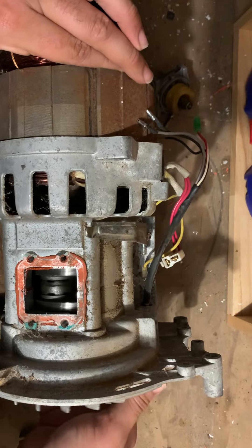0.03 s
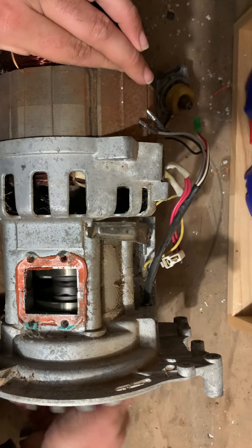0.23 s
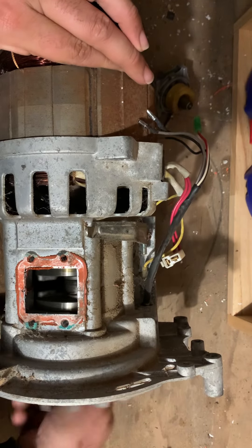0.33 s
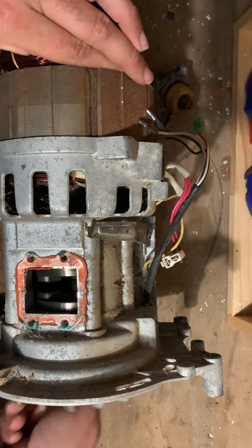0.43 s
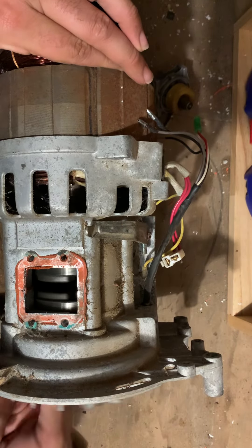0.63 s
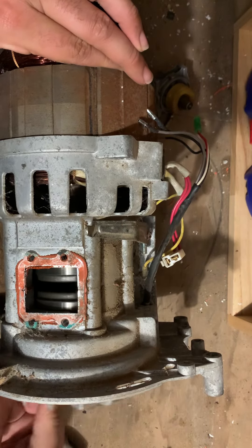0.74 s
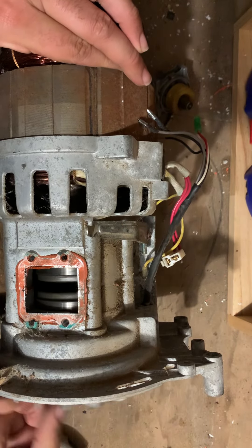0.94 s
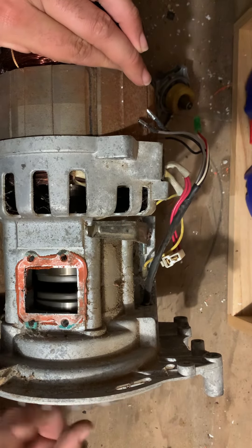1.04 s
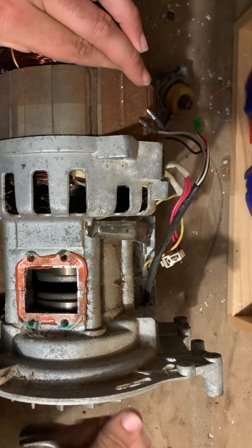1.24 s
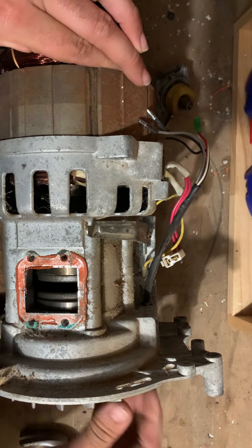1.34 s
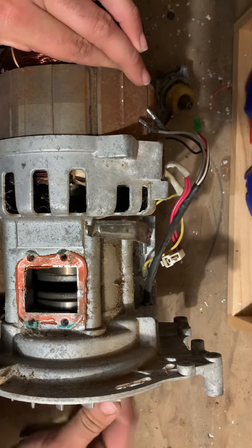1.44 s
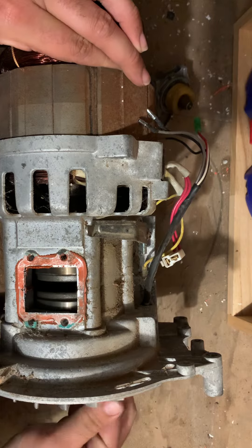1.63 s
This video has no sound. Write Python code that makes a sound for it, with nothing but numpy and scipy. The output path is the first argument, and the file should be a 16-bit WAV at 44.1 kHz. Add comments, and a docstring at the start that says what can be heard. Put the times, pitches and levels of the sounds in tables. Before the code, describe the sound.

Dry metal scraping and clunking as a small engine's piston is rocked by hand.

```python
"""A dry piston scrapes down its bore and back as the crankshaft of a small stripped engine is rocked by hand.
Its stick and slip rings the cast housing; loose parts take up their play with clunks. On top ride small
ticks, a thin steel squeal and a fine hiss, probably fingers sliding over the metal. The wooden bench rumbles
and thuds softly when the hand takes a new grip. It is all heard close, at a phone in a small workshop."""
import sys
import numpy as np
from scipy import signal
from scipy.fft import rfft, irfft
from scipy.io import wavfile
from scipy.ndimage import uniform_filter1d

SR = 44100
rng = np.random.default_rng(int(sys.argv[2]) if len(sys.argv) > 2 else 0)


def unload_wav(signal):
    """Save mono or channel-first audio to the path in sys.argv[1] as 16-bit WAV at rate SR, clipped to [-1, 1]."""
    wavfile.write(
        sys.argv[1],
        SR,
        np.round(np.clip(np.atleast_2d(signal).T, -1, 1) * 32767).astype(np.int16),
    )


N = 74970

# Modes of the cast housing. Each row: pitch in Hz, t60 in seconds, then relative level in dB
# when knocked, in the down stroke and in the back stroke.
HOUSING_MODES = [(445, 0.13, -21, -12.5, -6), (467, 0.11, -12.5, -24.5, -6), (537.2, 0.23, -4.5, -7, -14),
                 (604, 0.059, -4, -2.5, -9.5), (824.2, 0.18, 3, -2.5, -6), (844.4, 0.1, 6, -0.5, -4.5),
                 (900.2, 0.18, 1, -10.5, -6), (996, 0.14, -7.5, -26.5, 0.5), (1252.7, 0.15, 2, 7, 1),
                 (1327, 0.028, 4.5, -29.5, 0.5), (1477, 0.075, -1, -3, -30), (1638, 0.11, -10.5, -26.5, -6),
                 (1782, 0.059, -1, 0.5, -5.5), (1908, 0.036, -11, -5.5, -1), (2519, 0.16, -2.5, -7, -28.5)]
# Bright steel modes. Each row: pitch in Hz, t60 in seconds, relative dB when knocked and when rubbed.
STEEL_MODES = [(3683, 0.25, -2, -62.5), (4100, 0.051, 8.5, -31.5), (5950, 0.09, -3, -12),
               (6540, 0.06, -8, -8), (7230, 0.33, -7.5, -42), (10570, 0.12, -16.5, -7),
               (10955, 0.037, -31, -2.5), (10770, 0.063, -26, -8.5), (13800, 0.088, -18, -6.5)]
# Knocks of the loose parts, then three soft, dull thuds as the hand takes a new grip on the flywheel.
# Each row: start in seconds, levels in dB sent to the housing, the clack and the bench thud,
# pitch of the contact in Hz, its t60 in seconds.
BLOWS = [(.1008, -39, -72, -81, 1276, 0.071), (.138, -40.5, -63.5, -53, 1282, 0.12),
         (0.218, -32.5, -52.5, -80, 1250, 0.076), (.2440, -34.5, -51.5, -64, 1260, 0.11),
         (.2666, -20, -31.5, -43.5, 897, 0.05), (.2745, -29.5, -30.5, -54, 880, 0.031),
         (.2886, -28.5, -34, -45, 847, 0.15), (.3018, -26, -33.5, -59, 1200, 0.024),
         (.3612, -23.5, -38, -64, 1197, 0.025), (.4035, -31, -58, -47.5, 1150, 0.02),
         (.4630, -31, -51, -64, 900, 0.02), (.5215, -29, -95, -58, 1310, 0.017),
         (.5540, -35, -76, -84, 1300, 0.014), (.6010, -36.5, -72, -70, 1290, 0.017),
         (.6783, -33, -34.5, -58, 1243, 0.076), (.7960, -32, -44.5, -73, 983, 0.033),
         (.8015, -32.5, -64, -53, 940, 0.023), (.8293, -29, -46, -65, 1270, 0.037),
         (.9290, -38, -54, -79, 1100, 0.022), (.9690, -35, -58, -74, 1215, 0.053),
         (.9840, -34.5, -57, -89, 930, 0.13), (1.0130, -31, -50, -76.5, 992, 0.093),
         (1.0295, -35, -54, -82, 1001, 0.13), (1.0515, -34, -53, -55.5, 910, 0.031),
         (1.1100, -38.5, -59, -72, 1000, 0.049), (1.1456, -41, -36, -78, 952, 0.15),
         (1.4375, -42.5, -55, -47.5, 569, 0.067), (1.4570, -42, -54, -55.5, 890, 0.061),
         (1.4745, -57.5, -62, -40.5, 444, 0.15)]
# Colours of the housing's crowded modes and of the fine high hiss. Each row: frequency in Hz, relative dB.
BODY_COLOUR = [(380, -34), (520, -23), (700, -38), (880, -3), (1300, 1), (1800, -12), (2150, -17.5),
               (2550, -17.5), (3200, -23), (5000, -58)]
HISS_COLOUR = [(3000, -55.5), (7200, -27), (9500, -26.5), (11300, 5.5), (13000, 4.5), (16000, -5)]
BODY_T60_S, ATTACK_S = 0.037, 0.0004


def undb(db):
    """Decibels to gain."""
    return 10 ** (np.asarray(db) / 20)


def unit(x):
    """Scale to rms 1."""
    return x / np.sqrt(np.mean(x ** 2))


def clock():
    """Time of every sample in seconds."""
    return np.arange(N) / SR


def bell(x, centre, width):
    """A bell curve of height 1; the width is its standard deviation."""
    return np.exp(-.5 * ((x - centre) / width) ** 2)


def fader(rows, column=1):
    """Gain over time along a level curve, silent outside it."""
    rows = np.array(rows)
    return undb(np.interp(clock(), rows[:, 0], rows[:, column], left=-np.inf, right=-np.inf))


def eq_curve(points):
    """Gain at every frequency, drawn through (Hz, dB) points."""
    hz, db = np.array(points).T
    return undb(np.interp(np.log(np.fft.rfftfreq(N, 1 / SR) + 1), np.log(hz + 1), db))


def noise(colour):
    """Noise of a given colour, rms 1."""
    return unit(irfft(rfft(rng.standard_normal(N)) * eq_curve(colour), N))


def band_noise(hz, width_hz):
    """Noise in one bell-shaped band, rms 1; around 0 Hz it is a random wander."""
    band = bell(np.fft.rfftfreq(N, 1 / SR), hz, width_hz)
    return unit(irfft(rfft(rng.standard_normal(N)) * band, N))


def fade(t60):
    """A fast attack and an exponential decay."""
    return (1 - np.exp(-clock() / ATTACK_S)) * np.exp(-np.log(1000) * clock() / t60)


def shaped(x, envelope):
    """Put an envelope on a sound and give the result the envelope's energy."""
    x = x * envelope
    return x * np.sqrt(np.sum(envelope ** 2) / np.sum(x ** 2))


def ping(hz, t60):
    """One struck mode: a dying sine."""
    return np.sin(2 * np.pi * hz * clock()) * fade(t60)


def ring(modes, column):
    """A set of modes answers one tap; neighbouring rows swing in opposite senses."""
    gains = undb(np.array(modes)[:, column])
    waves = sum((-1) ** k * gains[k] * ping(hz, t60) for k, (hz, t60, *_) in enumerate(modes))
    return waves / np.sqrt(np.sum(gains ** 2) / 2)


def burst(colour, t60):
    """A crowd of short modes: coloured noise that dies away."""
    return shaped(noise(colour), fade(t60))


def drive(force, response):
    """Send a force through a response scaled to unit energy."""
    return signal.fftconvolve(force, response / np.sqrt(np.sum(response ** 2)))[:N]


def delay(x, start_s):
    """Start a sound at a given time."""
    return np.concatenate([np.zeros(int(start_s * SR)), x])[:N]


def room_tone():
    """The workshop's faint, low, steady air."""
    # Each row: frequency in Hz, relative level in dB.
    colour = [(25, -21.5), (60, 2.5), (290, -1.5), (600, -4), (1200, -18), (16000, -21.5)]
    return undb(-72) * noise(colour)


def reflections(x, colour, t60):
    """A coloured wash of reflections that dies away, different left and right."""
    coloured = irfft(rfft(x) * eq_curve(colour), N)
    responses = [delay(rng.standard_normal(N) * fade(t60), start_s=0.0045) for _ in range(2)]
    return np.array([drive(coloured, response) for response in responses])


def ambience(x):
    """The bench throws back a short, warm echo; the workshop adds a faint, bright tail."""
    # Each row of both: frequency in Hz, relative level in dB.
    echo_colour = [(100, -3), (400, 17), (2800, -0.5), (16000, -36)]
    tail_colour = [(1000, -10), (3800, 16.5), (16000, -10)]
    echo = undb(-15) * reflections(x, echo_colour, t60=0.1)
    return echo + undb(-29) * reflections(x, tail_colour, t60=0.55)


def stereo_ports(x):
    """Sound reaches the phone's two microphone ports at slightly different times and levels."""
    # Each row: frequency in Hz, lead of the left side in radians.
    phase_lead = [(0, 0), (560, -.2), (750, .7), (1650, .6), (2500, 2.2), (3300, 1.6), (4200, 2.3),
                  (4700, 3.2), (14800, 18.7), (16000, 18.9)]
    # Each row: frequency in Hz, left minus right in dB.
    balance = [(60, 4), (110, -4.5), (380, -5.5), (1290, -5.5), (2380, -1), (15000, 0.1)]
    lead = np.interp(np.fft.rfftfreq(N, 1 / SR), *np.array(phase_lead).T)
    port = np.sqrt(eq_curve(balance)) * np.exp(.5j * lead)
    spectrum = rfft(x)
    return np.array([irfft(spectrum * port, N), irfft(spectrum / port, N)])


def bench_rumble():
    """The bench rumbles under the rocking engine, with one soft, deep bump."""
    # Each row: frequency in Hz, relative level in dB.
    colour = [(30, -26), (70, -8.5), (110, -24.5), (150, 4), (215, 1), (270, -22.5), (900, -32)]
    # Each row: time in seconds, rumble level in dB.
    levels = [(0, -72.5), (.2, -63.5), (.33, -58.5), (.68, -62.5), (.92, -73), (1.35, -74.5), (1.48, -58.5),
              (1.58, -86), (1.7, -75)]
    bump = undb(-63) * band_noise(43.8, width_hz=30) * bell(clock(), centre=1.165, width=0.063)
    return noise(colour) * fader(levels) + bump


def bench_thud():
    """A soft push sets all modes of the bench top swinging together."""
    # Each row: pitch in Hz, t60 in seconds, relative level in dB.
    wood_modes = [(155, 0.16, -11), (177, 0.1, -6.5), (211, 0.11, -5)]
    soft_rise = 1 - np.exp(-clock() / 0.0036)
    return soft_rise * sum(undb(db) * ping(hz, t60) for hz, t60, db in wood_modes)


def ticks():
    """Brief ticks, chirps and swishes where a metal edge catches."""
    # Each row: centre time in seconds, level in dB, pitch in Hz, bell widths in Hz and in seconds.
    catches = [(0.335, -47, 12600, 2520, 0.0024), (0.341, -37.5, 11300, 410, 0.0016),
               (0.366, -35, 2550, 59.4, 0.0058), (0.4, -43.5, 3590, 220, 0.0062),
               (1.015, -50, 4020, 159, 0.012), (1.072, -47, 13300, 1110, 0.0091),
               (1.2486, -43, 5300, 2080, 0.00036), (1.576, -67.5, 14700, 1220, 0.0029),
               (1.381, -54, 14300, 904, 0.012)]
    return sum(undb(db) * shaped(band_noise(hz, width_hz), bell(clock(), at, width_s))
               for at, db, hz, width_hz, width_s in catches)


def sliding_hiss():
    """A fine, uneven high hiss of rubbing, probably fingers sliding over the metal; the steel sings faintly."""
    # Each row: time in seconds, level of the sliding force in dB.
    levels = [(0, -85), (.19, -71), (.28, -60), (.335, -48.5), (.37, -54.5), (.42, -50), (.48, -60),
              (.61, -58.5), (.69, -86), (.9, -80), (.96, -51), (1.055, -67), (1.076, -55), (1.12, -71),
              (1.3, -82), (1.42, -55), (1.445, -38), (1.475, -49), (1.51, -101), (1.66, -80), (1.7, -57)]
    flicker = undb(4 * band_noise(0, width_hz=28))
    force = unit(rng.standard_normal(N) * flicker) * fader(levels)
    hiss = undb(-3.5) * drive(force, burst(HISS_COLOUR, t60=0.051))
    return hiss + undb(-8) * drive(force, ring(STEEL_MODES, column=3))


def squeal():
    """Dry friction keeps one steel mode singing in surges, rough in pitch and strength."""
    # Each row: time in seconds, squeal level in dB.
    levels = [(.39, -55), (.408, -54), (.53, -61.5), (.56, -81), (.6, -57.5), (.66, -72), (.8, -76),
              (.84, -63.5), (.91, -70.5), (.99, -62), (1.07, -58), (1.13, -89)]
    hz = 5965 + 30 * band_noise(0, width_hz=90)
    flutter_db = 2.2 * band_noise(0, width_hz=90)
    surge_db = 3.5 * band_noise(0, width_hz=14)
    tone = np.sin(2 * np.pi * np.cumsum(hz) / SR)
    return unit(tone * undb(flutter_db + surge_db)) * fader(levels)


def clunks():
    """Each blow knocks at the contact, rings the housing, clacks the steel and thumps the bench."""
    # Each row: frequency in Hz, relative level in dB.
    clack_colour = [(900, -34), (1800, -8), (3300, 0.5), (4300, -3), (6200, -4.5), (8000, -12),
                    (11000, -27), (16000, -30)]
    housing, steel = ring(HOUSING_MODES, column=2), ring(STEEL_MODES, column=2)
    thud = bench_thud()
    hard_blow_db, out = -24, 0
    for start, body_db, clack_db, thud_db, hz, t60 in BLOWS:
        body = undb(-4.5) * (ping(hz, t60) + housing) + undb(-6) * burst(BODY_COLOUR, BODY_T60_S)
        steel_db = -9 + 0.6 * (body_db - hard_blow_db)  # harder blows leave more ring in the steel
        clack = undb(steel_db) * steel + undb(-1.5) * burst(clack_colour, t60=0.048)
        snap = undb(-5) * burst(HISS_COLOUR, t60=0.005)
        clunk = undb(body_db) * body + undb(clack_db) * (clack + snap) + undb(thud_db) * thud
        out = out + delay(clunk, start)
    return out


def sticking():
    """The parts stick just before each blow, ducking the scrape for a moment."""
    duck_db, stick_s = -9, 0.009
    hold = sum(bell(clock(), start - stick_s, stick_s) for start, *_ in BLOWS)
    return undb(duck_db * np.minimum(hold, 1))


def friction():
    """Stick and slip: uneven little jolts over a smooth rub, with a steady mean strength."""
    slips_per_s, spread_db = 380, 4
    slipping = rng.random(N) < slips_per_s / SR
    strength = undb(spread_db * np.minimum(rng.exponential(size=N), 4))
    rub = rng.standard_normal(N)
    force = unit(slipping * strength * np.sign(rub)) + undb(-8) * rub
    return force / np.sqrt(uniform_filter1d(force ** 2, size=1800))


def scrape(stroke, housing):
    """One drag along the bore: slips ring the housing, rasp in the treble and make a bright mode sing."""
    # Each row: frequency in Hz, relative level in dB.
    grit_colour = [(1200, -17), (2200, 2), (2600, 16.5), (3100, 1.5), (4000, -1.5), (5000, -22.5),
                   (6100, -2), (7000, -25.5), (16000, -30)]
    force = friction() * sticking()
    push, rasp = force * fader(stroke, column=1), force * fader(stroke, column=2)
    body = undb(0.5) * drive(push, housing) + undb(-9) * drive(push, burst(BODY_COLOUR, BODY_T60_S))
    singing = undb(-6) * drive(rasp, ping(hz=2581, t60=0.055))
    grit = undb(-4) * drive(rasp, burst(grit_colour, t60=0.072))
    return body + singing + grit


def piston():
    """The dry piston goes down and back; each stroke favours different modes of the housing."""
    # Each row of both: time in seconds, level in dB sent to the housing, level in dB sent to the rasp.
    down_stroke = [(0, -48.5, -72), (.09, -55, -82), (.16, -45, -55.5), (.26, -63, -41.5),
                   (.31, -36.5, -45), (.41, -58, -37), (.45, -41.5, -48), (.55, -41, -40), (.62, -50, -53),
                   (.7, -56.5, -56.5), (.78, -45.5, -52.5)]
    back_stroke = [(.73, -54, -105), (.795, -36.5, -36.5), (.84, -42.5, -44), (.87, -57.5, -62.5),
                   (.918, -40, -44.5), (.935, -37.5, -45), (.985, -30, -33.5), (1.05, -34, -36),
                   (1.08, -45, -55.5), (1.17, -53, -49), (1.21, -66, -62), (1.32, -85, -80),
                   (1.39, -66, -63.5), (1.56, -97, -91), (1.635, -77.5, -86), (1.7, -50, -73)]
    down = scrape(down_stroke, ring(HOUSING_MODES, column=3))
    return down + scrape(back_stroke, ring(HOUSING_MODES, column=4))


def scene():
    """The engine on its bench, close and in stereo, with the workshop around it."""
    engine = piston() + clunks() + squeal() + sliding_hiss() + ticks() + bench_rumble()
    return stereo_ports(engine + room_tone()) + ambience(engine)


def record(dry):
    """The phone cuts the top with a steep low-pass."""
    top_hz = 15750
    return signal.sosfilt(signal.ellip(10, .2, 70, top_hz, fs=SR, output="sos"), dry)


dry = scene()
out = record(dry)
unload_wav(out)
```